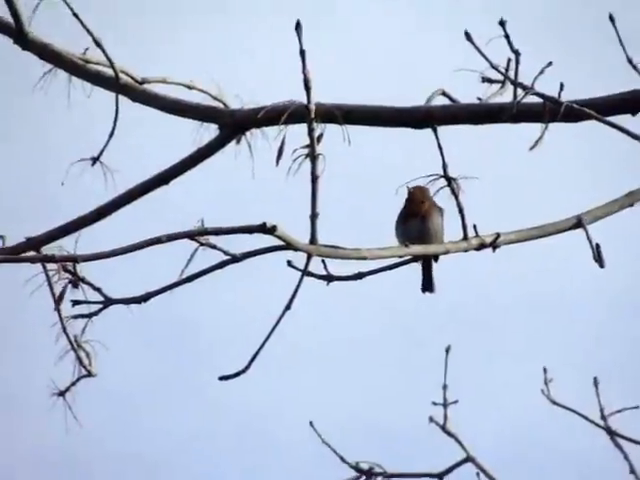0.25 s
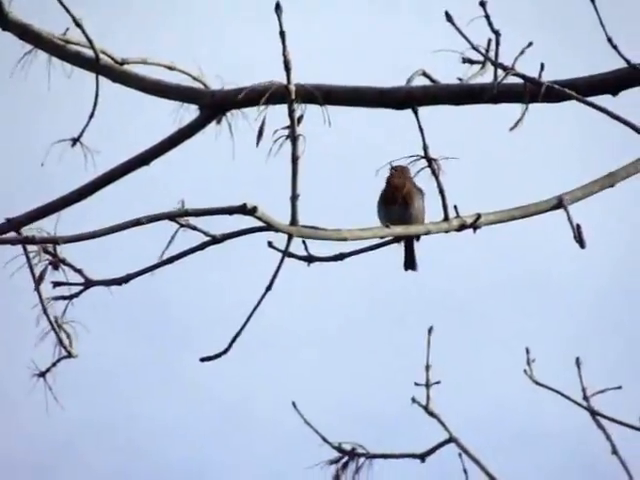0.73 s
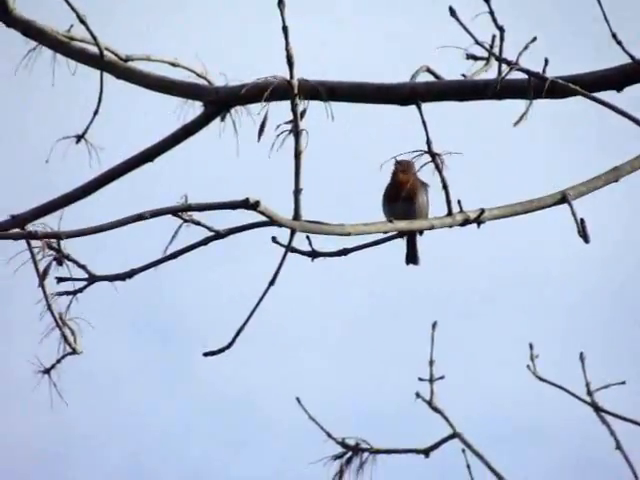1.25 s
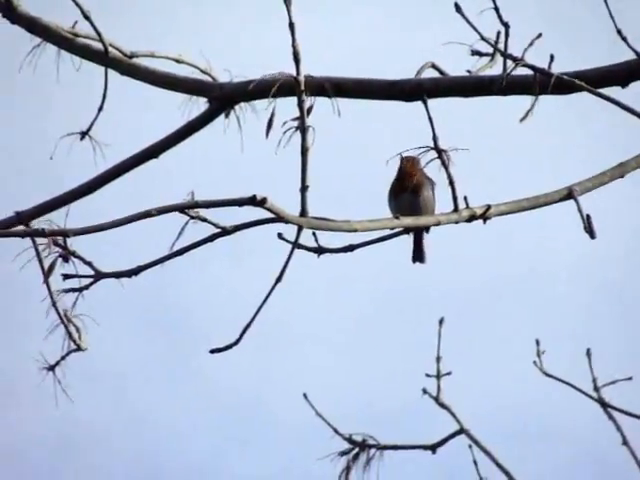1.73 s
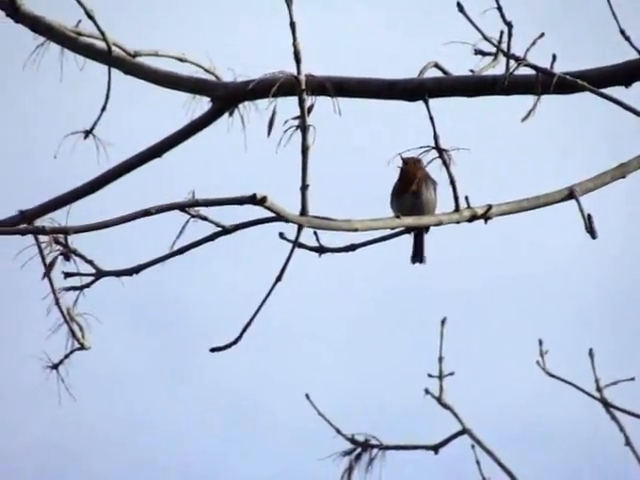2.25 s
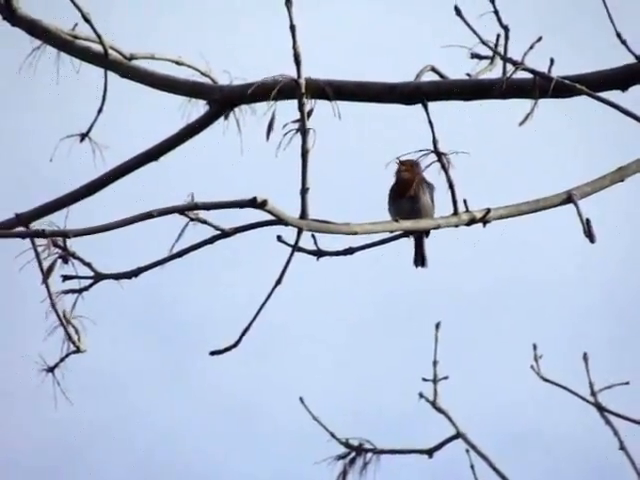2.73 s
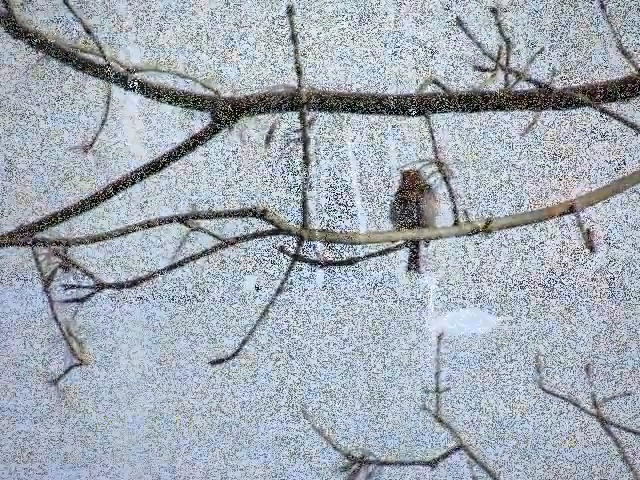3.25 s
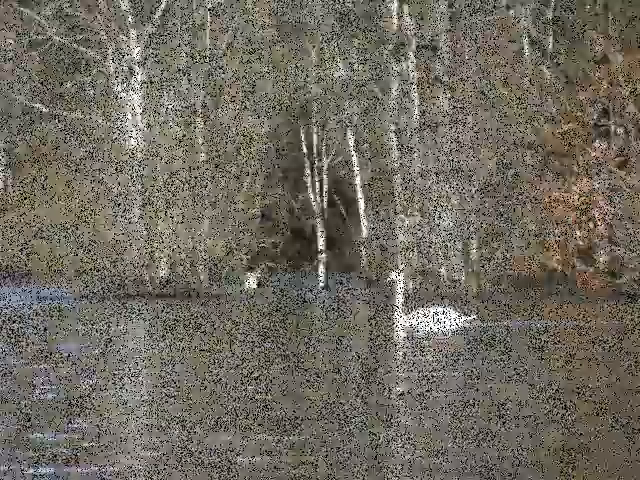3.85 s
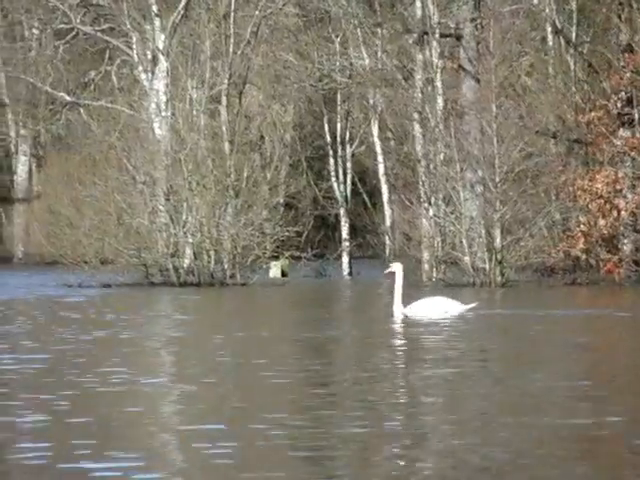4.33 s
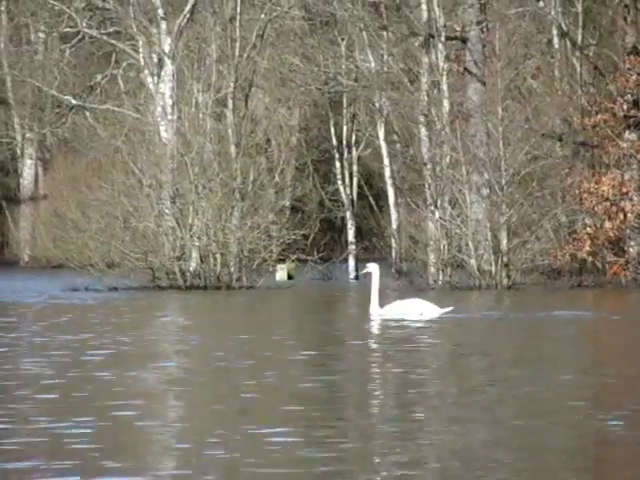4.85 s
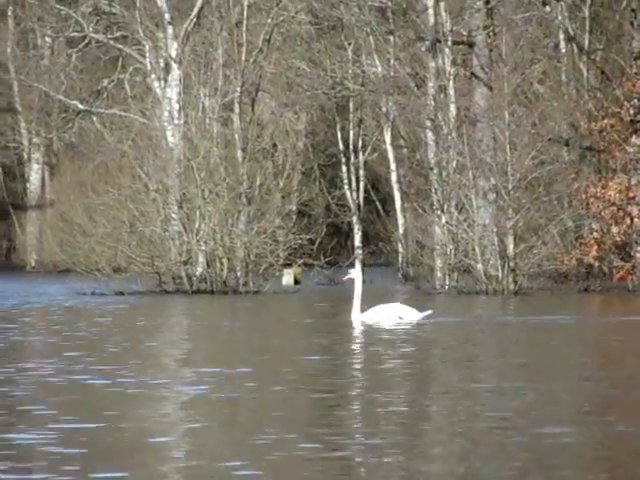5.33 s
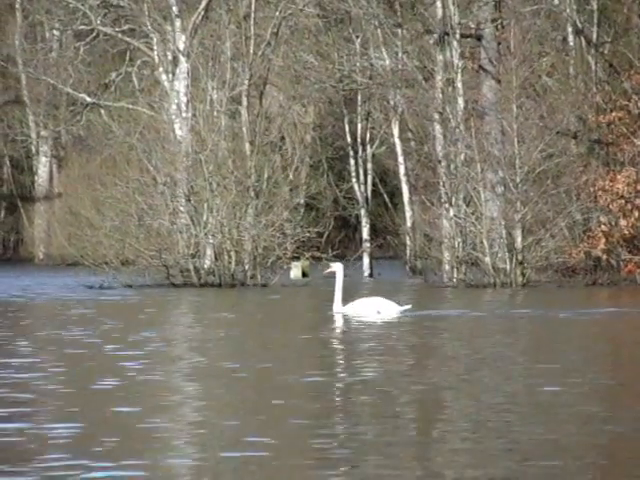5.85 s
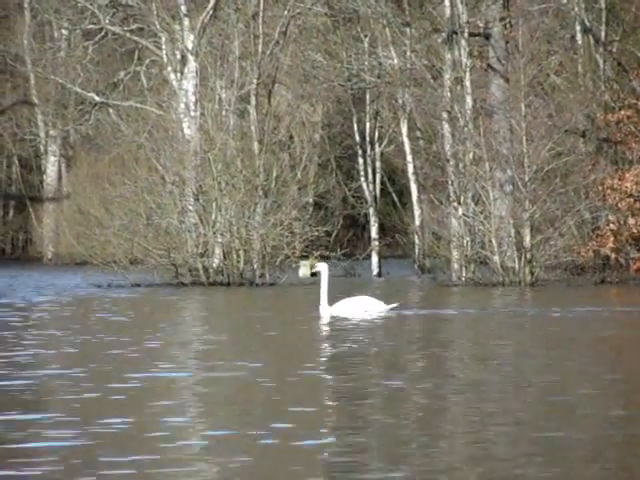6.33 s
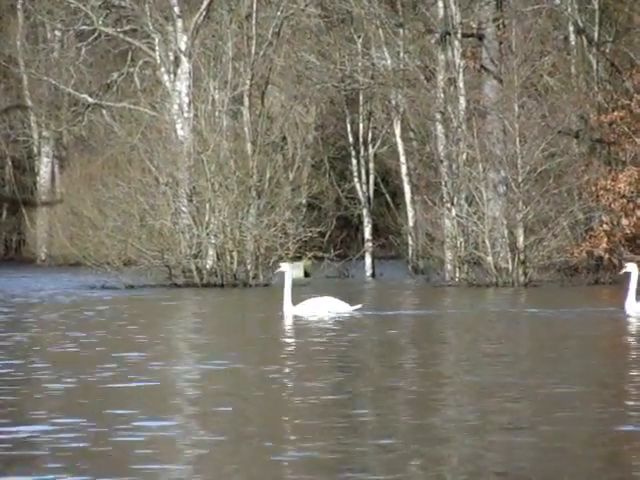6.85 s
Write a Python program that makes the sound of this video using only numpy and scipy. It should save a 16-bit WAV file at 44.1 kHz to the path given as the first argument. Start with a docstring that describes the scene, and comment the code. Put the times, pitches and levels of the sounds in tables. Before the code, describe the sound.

Outdoors, wind thumps and rumbles on a small camera microphone while a robin close by sings a bright, fast warble of squeaks, flicks and sliding whistles, with light echo from trees. The song ends after about three seconds; a hard dry snap follows. Then a calm pond: soft hiss, thin distant twittering, a run of falling notes, two clear rising calls and faint ticks.

```python
"""Wind rumbles on a camera microphone over a soft outdoor hiss, both of them filtered noise. A robin on a bare
branch sings a warbling phrase: two gliding sines, one for each side of its syrinx, echoed by trees. A hard object
snaps. Then comes a still pond: the wind is gone, and far birds sing, twitter and call amid faint clicks and ticks.
The camera holds each sample of its slower clock, which folds the sound into ghost tones."""
import sys
import numpy as np
from scipy import signal
from scipy.fft import rfft, irfft, next_fast_len
from scipy.io import wavfile
from scipy.ndimage import uniform_filter1d

SR = 44100
rng = np.random.default_rng(int(sys.argv[2]) if len(sys.argv) > 2 else 0)


def unload_wav(signal):
    """Save mono or channel-first audio to the path in sys.argv[1] as 16-bit WAV at rate SR, clipped to [-1, 1]."""
    wavfile.write(
        sys.argv[1],
        SR,
        np.round(np.clip(np.atleast_2d(signal).T, -1, 1) * 32767).astype(np.int16),
    )


N = 313127
T = np.arange(N) / SR  # time, s


def undb(db):
    """Decibel definition: 20 dB is a factor of ten in amplitude."""
    return 10 ** (np.asarray(db) / 20)


def unit(x):
    """Power normalisation: scale to rms 1."""
    return x / np.sqrt(np.mean(np.abs(x) ** 2))


def walk(rate):
    """Band-limited random modulation: levels held 1 / rate s, smoothed by two moving averages, spread 1."""
    hold = int(SR / rate)
    steps = np.repeat(rng.standard_normal(N // hold + 1), hold)
    smooth = uniform_filter1d(uniform_filter1d(steps, hold), hold)[:N]
    return smooth / smooth.std()


def coloured(shape, bumps=(), flicker_db=0., rate=8.):
    """Spectral shaping of white noise to rms 1; each octave band may flicker on its own."""
    size = next_fast_len(N)
    hz = np.maximum(np.fft.rfftfreq(size, 1 / SR), 1)
    shape_hz, shape_db = np.transpose(shape)
    db = np.interp(np.log(hz), np.log(shape_hz), shape_db, left=-90)
    for centre_hz, width_hz, bump_db in bumps:
        db = db + bump_db * np.exp(-((hz - centre_hz) / (width_hz / 2)) ** 2)
    spectrum = rfft(rng.standard_normal(size)) * undb(db)
    if not flicker_db:
        return unit(irfft(spectrum, size)[:N])
    octave = np.clip(np.log2(hz / 30), 0, 9)
    total = np.zeros(N)
    for k in range(10):
        weight = np.maximum(1 - abs(octave - k), 0)  # neighbouring bands cross-fade
        total += irfft(spectrum * weight, size)[:N] * undb(flicker_db * walk(rate))
    return unit(total)


def wind():
    """Turbulent pressure at the microphone: deep rumble, brighter flutter in gusts, damped single buffets."""
    # gusts: start_s, rumble_db
    gusts = [(0.0, -51), (0.07, -41.5), (0.19, -35), (0.24, -48.5), (0.48, -23.5), (0.7, -26),
             (0.87, -40.5), (0.9, -36), (1.12, -49.5), (1.88, -33), (1.9, -41.5), (2.22, -34),
             (2.33, -46.5), (2.49, -49.5), (2.66, -37.5), (2.86, -46), (3.39, -42.5), (3.62, -47)]
    # rumble spectrum: frequency_hz, density_db (relative, per Hz)
    rumble_shape = [(20, -18), (40, 1), (60, 3.5), (110, 5), (170, 0.5), (250, -11.5), (400, -47.5)]
    # flutter spectrum: frequency_hz, density_db (relative, per Hz)
    flutter_shape = [(120, -11), (200, 0.5), (320, -1), (500, -13), (700, -15.5), (1000, -28.5),
                     (1400, -38.5), (2500, -52.5)]
    # flutter against the rumble, strongest in the big gust: time_s, level_db
    flutter_level = [(0, -7), (.44, -6.5), (.455, 0.5), (.7, -0.5), (.712, -10), (3.62, -11.5)]
    # single buffets in the strongest gust: start_s, peak_db
    buffets = [(0.413, -23.5), (0.451, -15.5), (0.495, -15), (0.517, -13), (0.542, -16), (0.577, -26),
               (0.608, -11.5), (0.628, -16.5), (0.682, -16.5)]
    gustiness_db, buffet_hz = 1.5, 244

    # all but silent after the last gust
    level_db = np.interp(T, *np.transpose(gusts), right=-120) + gustiness_db * walk(14)
    flutter_db = np.interp(T, *np.transpose(flutter_level)) + 3.2 * walk(70)
    flutter = undb(flutter_db) * coloured(flutter_shape)
    out = undb(level_db) * (coloured(rumble_shape, flicker_db=0.5, rate=20.0) + flutter)

    # the membrane is pushed in and swings back ever more slowly, down to buffet_hz
    t = np.arange(SR // 10) / SR
    slowing_t = t + 0.0044 * (1 - np.exp(-t / 0.0022))
    envelope = (1 - np.exp(-t / 0.00093)) ** 2 * np.exp(-t / 0.0039)
    swing = np.sin(2 * np.pi * buffet_hz * slowing_t) * envelope
    swing = swing / abs(swing).max()
    for s, db in buffets:
        i = int(s * SR)
        out[i:i + len(t)] -= undb(db) * swing
    return out


def air():
    """Broadband ambient noise: a distant outdoor hiss; by the pond one narrow band of it wavers."""
    # hiss spectrum: frequency_hz, density_db (relative, per Hz)
    hiss_shape = [(12, -48.5), (25, -11), (68, -10.5), (154, -5.5), (388, -6), (600, -3), (949, -8),
                  (1530, -6.5), (2100, -4.5), (2600, -12), (4400, -14), (6500, -16.5), (9600, -17.5),
                  (10300, -33.5), (16000, -50)]
    # hums in the hiss: centre_hz, width_hz, boost_db
    hums = [(935, 120, 6.5), (1433, 71, 5)]
    # hiss level: time_s, level_db
    hiss_level = [(0, -51.5), (.4, -51.5), (3.0, -50.5), (3.55, -54.5), (3.75, -52), (7.1, -51)]
    # spectrum of the wavering band: frequency_hz, density_db (relative, per Hz)
    waver_shape = [(1800, -49), (1900, -3.5), (1970, 3), (2050, -6), (2150, -39)]
    # its mean level: time_s, level_db
    waver_level = [(3.55, -86), (3.7, -59.5), (4.8, -63), (7.1, -63.5)]

    hiss_db = np.interp(T, *np.transpose(hiss_level))
    hiss = undb(hiss_db) * coloured(hiss_shape, hums, flicker_db=1.0, rate=12.0)
    waver_db = np.interp(T, *np.transpose(waver_level), left=-120) + 4. * walk(18)
    return hiss + undb(waver_db) * coloured(waver_shape)


def bend(start, length, first_hz, turn, turn_hz, last_hz, first_db, turn_db, last_db, power):
    """Frequency glide: pitch and level ease into a turning point and leave it; power 1 is straight, 2 round."""
    u = np.linspace(0, 1, 25)
    turn = np.clip(turn, .05, .95)
    before = u < turn
    away = np.where(before, 1 - u / turn, (u - turn) / (1 - turn)) ** power
    hz = turn_hz + away * (np.where(before, first_hz, last_hz) - turn_hz)
    db = turn_db + away * (np.where(before, first_db, last_db) - turn_db)
    return np.transpose([start + length * u, hz, db])


def sweep(start, wait, top_hz, db):
    """Linear frequency sweep: wait at the top, fall at a steady rate, sag along a shelf, drop out."""
    fall_hz_per_s, shelf_hz, sag_hz, bottom_hz = 80000, 3860, 198.7, 2939
    shelf_s, drop_s = .01, .01
    wait_end_db, shelf_end_db, bottom_db = -4, -5, -17.5  # against the starting level

    fall = start + wait
    shelf = fall + (top_hz - shelf_hz) / fall_hz_per_s
    drop = shelf + shelf_s
    return [(start, top_hz, db),
            (fall, top_hz, db + wait_end_db),
            (shelf, shelf_hz, db),
            (drop, shelf_hz - sag_hz, db + shelf_end_db),
            (drop + drop_s, bottom_hz, db + bottom_db)]


def voices():
    """Two-source phonation: the notes of the upper and of the lower side of the syrinx."""
    # simple notes that bend once: start_s, length_s, first_hz, turn (share of the length, held to 0.05-0.95),
    # turn_hz, last_hz, first_db, turn_db, last_db, side
    bends = [ (0.271, 0.076, 8480, .6, 8280, 8230, -64, -45, -44, "upper"),
             (0.466, 0.053, 9230, .5, 9690, 9480, -56, -53.5, -47, "upper"),
             (0.479, 0.027, 8340, 0.4, 8280, 8040, -49, -43, -30.5, "lower"),
             (0.51, 0.061, 8410, 0.85, 8100, 8067, -37, -34.5, -39, "lower"),
             (0.523, .13, 9704, .8, 8450, 8520, -41.5, -26.5, -26.5, "upper"),
             (0.669, .029, 8253, .55, 8040, 8130, -33, -22.5, -24.5, "upper"),
             (0.703, .023, 9010, 0.51, 8700, 8500, -31.5, -37, -40, "upper"),
             (0.729, .034, 8310, .7, 8150, 8145, -36, -26.5, -27, "upper"),
             (0.853, 0.022, 3477, .7, 4100, 4208, -18.5, -20, -42, "upper"),
             (0.87, 0.012, 3486, 0.57, 3190, 2742, -22, -18.5, -35, "lower"),
             (0.899, 0.018, 3182, .33, 3962, 3220, -22.5, -13.5, -20.5, "upper"),
             (1.316, 0.21, 3398, .4, 3217, 3412, -34.5, -35, -41.5, "lower"),
             (1.543, .03, 7890, .9, 7110, 7077, -48, -53.5, -47, "upper"),
             (1.665, .021, 8750, .5, 9230, 8916, -26, -35, -22, "upper"),
             (1.923, .042, 6495, 0.73, 7680, 6713, -33, -19, -24.5, "lower"),
             (2.229, 0.038, 7900, 0.53, 8010, 7995, -28, -23.5, -22.5, "lower"),
             (2.244, .03, 8976, 0.53, 9220, 9070, -30, -33, -42, "upper"),
             (2.347, 0.0054, 7026, 0.98, 8820, 8850, -20, -32, -33, "upper"), ]
    # the same columns, for notes scooped up from below just before start_s
    leaps = [ (1.634, .017, 7060, 0.59, 8390, 8390, -21, -22, -31, "upper"),
             (1.643, 0.12, 6627, 0.35, 7936, 6920, -29.5, -20.5, -25.5, "lower"),
             (1.922, .011, 7260, 0.48, 8400, 8350, -20, -21, -28, "upper"),
             (2.21, 0.021, 8050, 0.88, 9030, 9030, -21, -34, -39, "upper"),
             (2.349, .024, 6004, 0.37, 6865, 5420, -23.5, -23.5, -33, "lower"), ]
    # lower side, a short rest and then a flick up: start_s, length_s, rest_hz, top_hz, rest_db
    flicks = [(0.826, .018, 3540, 4218, -20), (0.959, 0.02, 3256, 4890, -19),
              (1.099, .024, 3492, 4975, -13), (1.259, 0.018, 3455, 5064, -16)]
    # upper side, fast falls to a shelf: start_s, wait_s, top_hz, level_db
    sweeps = [(1.018, .01, 5180, -15), (1.177, .001, 5679, -12.5)]
    # upper side, one list for each long note: time_s, pitch_hz, level_db
    long_notes = [
        [(1.316, 3710, -21.5), (1.345, 3644, -17), (1.355, 3970, -27), (1.385, 3492, -25), (1.4, 3673, -21.5),
         (1.43, 3590, -34.5), (1.522, 3667, -36.5)],
        [(1.697, 8816, -27), (1.706, 9030, -25), (1.74, 8480, -22.5), (1.775, 7463, -18.5), (1.79, 7096, -19.5),
         (1.802, 6210, -24.5), (1.816, 4720, -31)],
        [(1.951, 8680, -30), (1.958, 8690, -27.5), (1.972, 7276, -21), (1.983, 7120, -24.5)],
        [(2.005, 4785, -34), (2.012, 7563, -19.5), (2.025, 7580, -20), (2.04, 8156, -19.5), (2.05, 8060, -24),
         (2.075, 6660, -23)],
        [(2.101, 4500, -46), (2.107, 7314, -22.5), (2.118, 7670, -16), (2.142, 8860, -25.5), (2.152, 8500, -23),
         (2.163, 7180, -26)],
        [(2.36, 8670, -30), (2.367, 6910, -26), (2.382, 6100, -27), (2.41, 6675, -22), (2.45, 6925, -20),
         (2.5, 6890, -18), (2.52, 6386, -18.5), (2.535, 5560, -30.5)],
        [(2.604, 3317, -27), (2.615, 3684, -13), (2.65, 3585, -15.5), (2.74, 3538, -14.5), (2.77, 3375, -16),
         (2.785, 2654, -38)],
        [(2.836, 2670, -26), (2.85, 2961, -23.5), (2.87, 3097, -15), (2.91, 3100, -23.5), (2.95, 3042, -27),
         (3.02, 3002, -27.5), (3.06, 3110, -45), (3.095, 2950, -42)],
    ]
    bend_power, flick_power = 1.7, 2.6
    scoop_s, scoop_hz, scoop_db = .007, 2875, -20
    flick_turn, flick_dip_hz, flick_in_db, flick_out_db = .42, 89.7, -11, 0.5
    shadow_from_s, shadow_to_s, shadow_hz, shadow_db = 2.372, 2.513, 1132, -7

    notes = {"upper": [*long_notes, *(sweep(*row) for row in sweeps)], "lower": []}
    for *row, side in bends:
        notes[side].append(bend(*row, bend_power))
    for *row, side in leaps:
        note = bend(*row, bend_power)
        scoop = note[0] + (-scoop_s, -scoop_hz, scoop_db)
        notes[side].append(np.vstack([scoop, note]))
    for s, length, rest_hz, top_hz, db in flicks:
        notes["lower"].append(bend(s, length, rest_hz + flick_dip_hz, flick_turn, rest_hz, top_hz,
                                   db + flick_in_db, db, db + flick_out_db, flick_power))

    # for a moment the lower side runs parallel to a long note, below it and softer
    s, hz, db = np.transpose(np.concatenate(long_notes))
    t = np.arange(shadow_from_s, shadow_to_s, 1 / 500)
    shadow = [t, np.interp(t, s, hz) - shadow_hz, np.interp(t, s, db) + shadow_db]
    notes["lower"].append(np.transpose(shadow))
    return notes["upper"], notes["lower"]


def whistle(notes, fade_s, shake_hz, shake_db, breath_db):
    """Frequency modulation of a complex sine: pitch and level tremble, breath noise blurs the line."""
    hz, gain = np.zeros(N), np.zeros(N)
    for note in notes:
        s, f, db = np.transpose(note)
        on = (T > s[0] - fade_s / 2) & (T < s[-1] + fade_s / 2)
        edge = np.clip(np.minimum(T[on] - s[0], s[-1] - T[on]) / fade_s + .5, 0, 1)
        fade = np.sin(np.pi / 2 * edge) ** 2
        hz[on] = np.interp(T[on], s, f)
        gain[on] = np.sqrt(2) * undb(np.interp(T[on], s, db)) * fade  # levels are rms
    hz = uniform_filter1d(hz, size=60) + shake_hz * walk(300)
    # the higher the note, the harder the air is driven and the breathier it gets
    breath_gain = undb(breath_db + 8.7 * np.log2(np.maximum(hz, 2000) / 4000))
    breath = 1 + breath_gain * (walk(1500) + 1j * walk(1500))
    tremble = undb(shake_db * walk(60) + 1.1 * walk(250))
    return gain * breath * tremble * np.exp(2j * np.pi * np.cumsum(hz) / SR)


def trees(x, gap_s, rise_s, t60, db):
    """Diffuse scattering: echoes from trunks and ground build up after a gap, then decay exponentially."""
    t = np.arange(2 * SR) / SR
    rise = 1 - np.exp(-np.maximum(t - gap_s, 0) / rise_s)
    tail = rng.standard_normal(2 * SR) * rise * undb(-60 * t / t60)
    tail = tail / np.sqrt(np.sum(tail ** 2))
    return undb(db) * signal.fftconvolve(x, tail)[:N]


def robin():
    """Nonlinear coupling: two voices modulated at their difference give side tones; octaves and hiss join."""
    # hiss spectrum: frequency_hz, density_db (relative, per Hz)
    hiss_shape = [(300, -29.5), (1000, -6.5), (3000, 6), (6000, 4.5), (10000, -1), (15500, -4.5)]
    # close echoes from branches and trunk: delay_s, level_db
    branch_echoes = [(.0021, -17), (.0042, -14), (.0072, -14), (.0095, -20), (.013, -21)]

    upper, lower = (whistle(voice, fade_s=.004, shake_hz=20.27, shake_db=1.3, breath_db=-22.5)
                    for voice in voices())
    power = abs(upper) ** 2 + abs(lower) ** 2 + 1e-9
    # at twice one pitch less the other
    side_tones = (upper * upper * lower.conj() + lower * lower * upper.conj()) / power
    octave = (upper * upper + lower * lower) / np.sqrt(power)
    song = (upper + lower + undb(-13.5) * side_tones + undb(-33.0) * octave).real
    hiss = undb(-31.5) * np.sqrt(power) * coloured(hiss_shape)

    branches = sum(undb(db) * np.roll(song, int(s * SR)) for s, db in branch_echoes)
    copse = trees(song + hiss, gap_s=0.027, rise_s=0.0067, t60=0.49, db=-15.0)
    copse = copse * undb(2.1 * walk(90))  # stirring leaves break the echo up
    far_trees = trees(song, gap_s=0.038, rise_s=0.043, t60=1.16, db=-28.5)
    return song + hiss + branches + copse + far_trees


def snap():
    """Modal vibration: a small hard object rings briefly in a few damped modes."""
    # modes: frequency_hz, level_db (relative), t60_s
    modes = [(2300, -6, 0.03), (3030, -2, 0.015), (6230, 6, 0.0085), (8000, -17, 0.015)]
    start_s, peak_db = 3.4333, -15.5

    t = np.maximum(T - start_s, 0)
    ring = sum(undb(db - 60 * t / t60) * np.sin(2 * np.pi * hz * t) for hz, db, t60 in modes)
    return undb(peak_db) * ring / abs(ring).max()


def twitter(table, rate, spread_hz, fall_hz):
    """Repeated downward chirps: an uneven pace near rate per s, each with its own pitch and strength."""
    s, hz, db = np.transpose(table)
    beat = np.cumsum(rate * undb(4.0 * walk(21))) / SR  # chirps so far
    pitch_chance, level_chance = rng.standard_normal((N // 100, 2))[beat.astype(int)].T
    sweep_hz = np.interp(T, s, hz) + spread_hz * pitch_chance + fall_hz * (.5 - beat % 1)
    pulses = np.sin(np.pi * beat) ** 4 * undb(3.5 * level_chance)
    chirps = np.sin(2 * np.pi * np.cumsum(sweep_hz) / SR) * pulses
    return unit(chirps) * undb(np.interp(T, s, db, left=-120, right=-120))


def far_birds():
    """Outdoor reverberation: distant song blurred by the wood; far shores throw back the pond calls."""
    # thin twitters, one table a bird: time_s, centre_hz, level_db
    mid_twitter = [(3.62, 5110, -71), (3.75, 5250, -60), (3.9, 5220, -66), (4.12, 5200, -61),
                   (4.2, 5250, -76)]
    # thin twitters of a higher bird: time_s, centre_hz, level_db
    high_twitter = [(6.55, 7750, -63), (6.66, 7900, -67), (6.78, 7750, -54.5), (6.87, 7630, -64),
                    (7.0, 7470, -60), (7.09, 7500, -69)]
    # level notes stepping down: start_s, length_s, pitch_hz, level_db
    far_steps = [(3.855, .03, 4790, -56), (3.96, 0.092, 4440, -55), (4.1, .08, 4290, -52.5)]
    # low calls, one list a call: time_s, pitch_hz, level_db
    low_calls = [
        [(3.93, 2990, -63), (3.99, 2600, -66)],
        [(4.06, 2550, -60), (4.09, 2660, -62), (4.12, 2450, -64)],
    ]
    # then a run of falling notes: start_s, top_hz, level_db
    far_falls = [(4.2, 3540, -54), (4.265, 3440, -49.5), (4.335, 3490, -49.5), (4.405, 3490, -49),
                 (4.479, 3410, -48), (4.56, 3290, -48), (4.635, 3280, -51.5)]
    # two rising calls across the pond: start_s, length_s, level_db
    pond_calls = [(5.066, .125, -39.5), (5.262, 0.14, -42.5)]
    # echoes across the pond: delay_s, level_db
    shores = [(.25, -17), (.46, -19), (.56, -23)]
    step_fade_db = -9
    fall_s, fall_hz, fall_power, fall_db = .044, 620, 1.9, -2
    call_from_hz, call_hz, call_sag_hz, call_rise_s, call_in_db, call_out_db = 2800, 4275, 48.7, .021, -16, -12

    steps = [[(s, hz, db), (s + length, hz, db + step_fade_db)] for s, length, hz, db in far_steps]
    u = np.linspace(0, 1, 9)
    falls = [np.transpose([s + fall_s * u, hz - fall_hz * u ** fall_power, db + fall_db * u])
             for s, hz, db in far_falls]
    rises = [[(s, call_from_hz, db + call_in_db),
              (s + call_rise_s, call_hz, db),
              (s + length, call_hz - call_sag_hz, db + call_out_db)] for s, length, db in pond_calls]

    twitters = twitter(high_twitter, rate=62., spread_hz=350., fall_hz=1410.0)
    twitters = twitters + twitter(mid_twitter, rate=75., spread_hz=300., fall_hz=900.)
    songs = whistle(steps + falls, fade_s=0.0066, shake_hz=27.9, shake_db=1.1, breath_db=-11.5).real
    low = whistle(low_calls, fade_s=.02, shake_hz=26.0, shake_db=3.0, breath_db=-14).real
    calls = whistle(rises, fade_s=.012, shake_hz=21.3, shake_db=1.4, breath_db=-13.5).real

    shore_echoes = sum(undb(db) * np.pad(calls, (int(s * SR), 0))[:N] for s, db in shores)
    song = songs + low + twitters + calls + shore_echoes
    blur = trees(song, gap_s=.005, rise_s=.01, t60=.18, db=-7)
    wood = trees(song, gap_s=.05, rise_s=0.033, t60=2.07, db=-11.5) * undb(2.9 * walk(12))
    return song + blur + wood


def clicks():
    """Band-passed, exponentially decaying noise bursts: a faint click and far ticking calls."""
    # bursts: start_s, peak_db, low_edge_hz, high_edge_hz, t60_s
    bursts = [(4.169, -41, 1800, 7000, .03), (5.057, -39, 5200, 6300, 0.14),
              (5.255, -39.5, 4800, 5700, 0.14), (5.975, -40.5, 6300, 7800, 0.17),
              (6.214, -42, 6300, 7700, 0.17)]

    out = np.zeros(N)
    t = np.arange(SR // 5) / SR
    for s, db, lo_hz, hi_hz, t60 in bursts:
        noise = rng.standard_normal(len(t)) * undb(-60 * t / t60)
        band = signal.butter(2, [lo_hz, hi_hz], "band", fs=SR, output="sos")
        burst = signal.sosfilt(band, noise)
        i = int(s * SR)
        out[i:i + len(t)] += undb(db) * burst / abs(burst).max()
    return out


def scene():
    """Superposition: the pressures of all sources add at one microphone."""
    return (wind() + air() + robin() + snap() + far_birds() + clicks())[None]


def record(dry):
    """Sample-and-hold imaging: the camera's slower clock holds each sample, then the top is cut."""
    up, down = 320, 441  # 44100 Hz to 32000 Hz
    top_hz = 15480
    slow = signal.resample_poly(dry, up, down, axis=1)
    index = (np.arange(N) * up + down // 2) // down
    held = slow[:, index % slow.shape[1]]
    low_pass = signal.ellip(10, .2, 80, top_hz, fs=SR, output="sos")  # ripple 0.2 dB, stop band -80 dB
    return signal.sosfilt(low_pass, held)


dry = scene()
out = record(dry)
unload_wav(out)
```